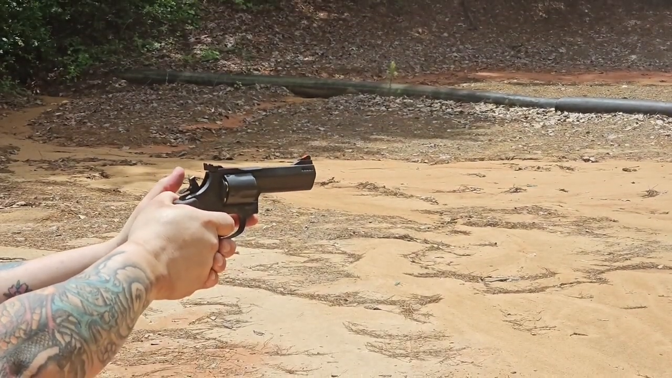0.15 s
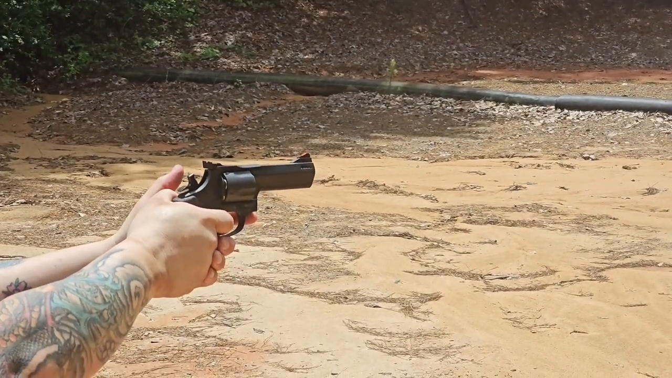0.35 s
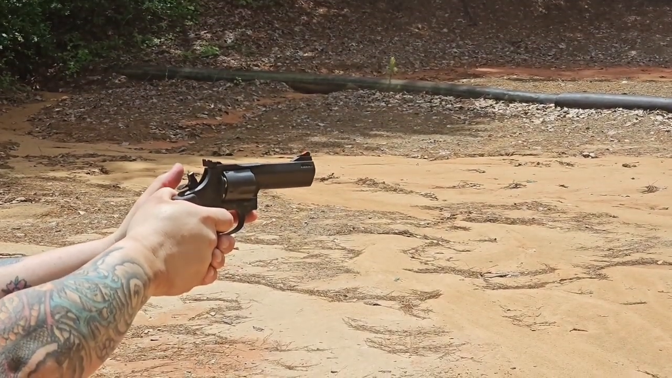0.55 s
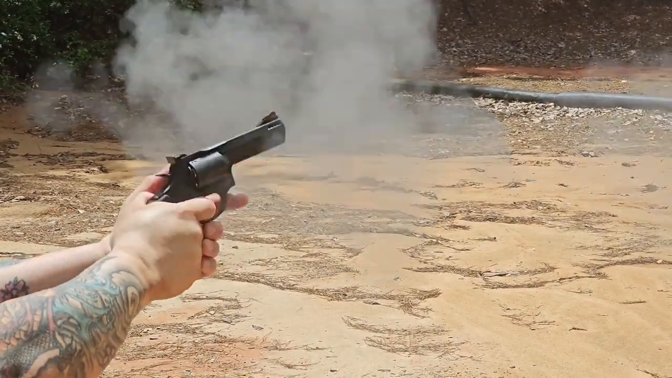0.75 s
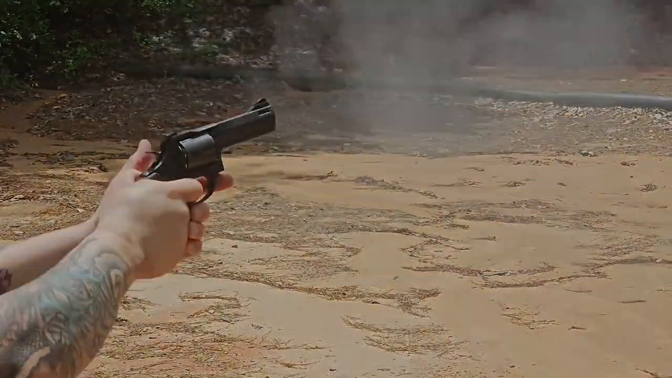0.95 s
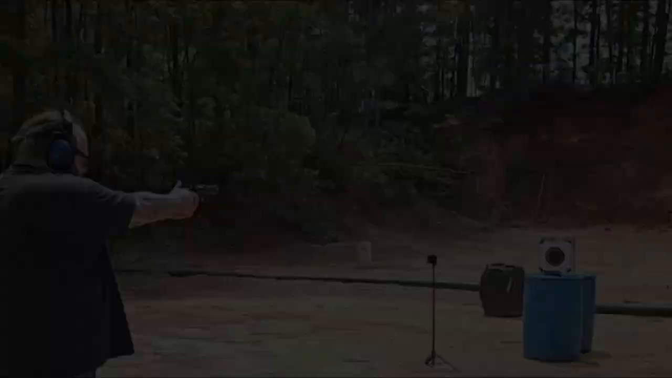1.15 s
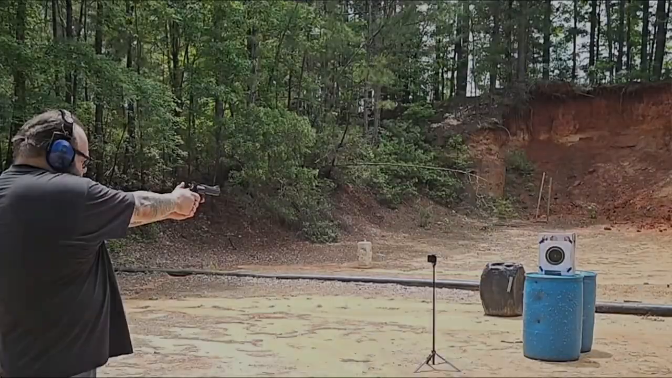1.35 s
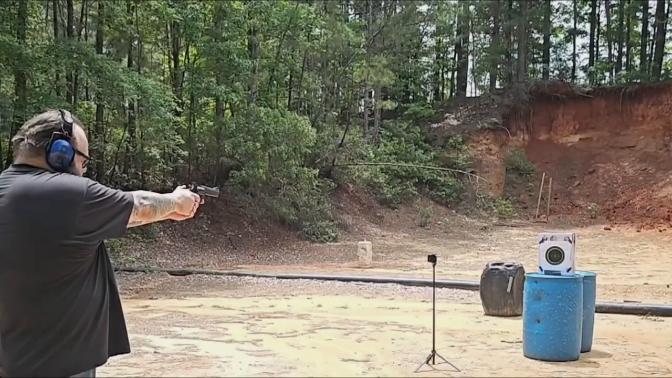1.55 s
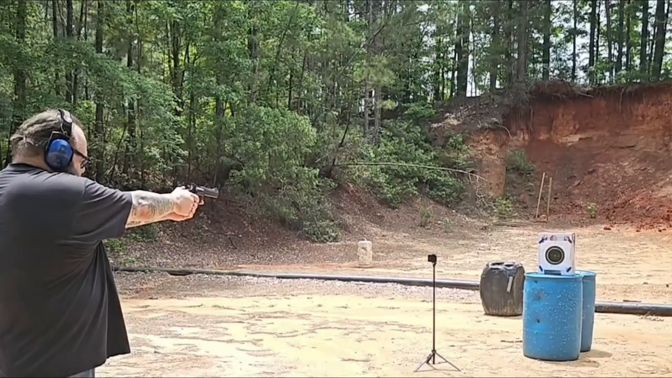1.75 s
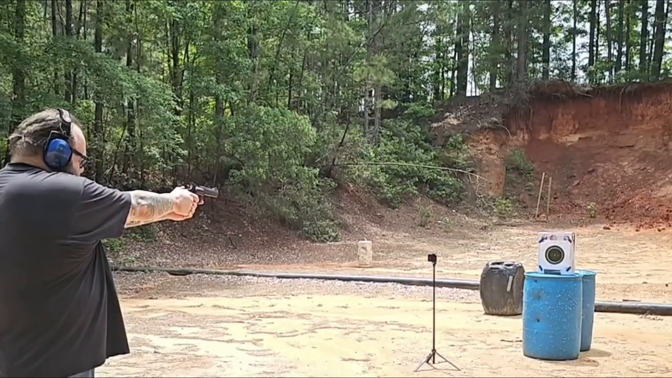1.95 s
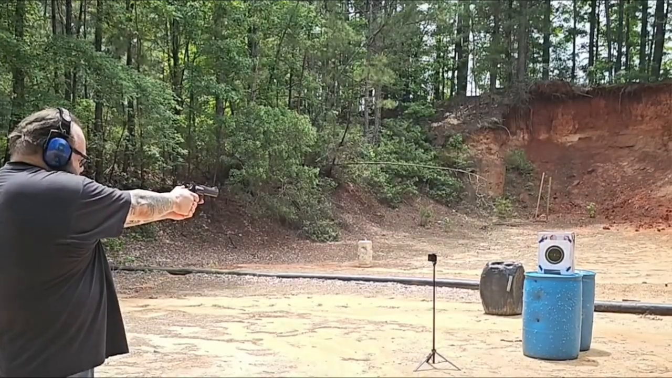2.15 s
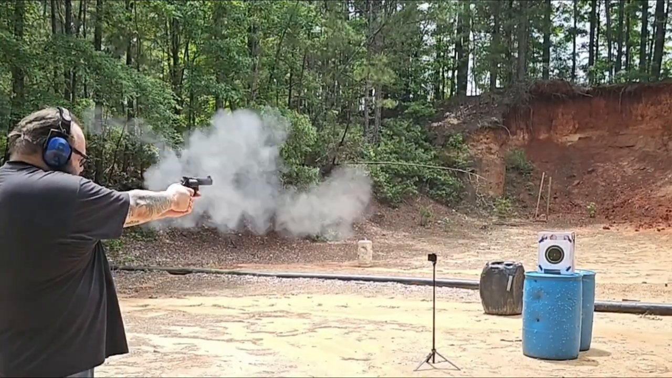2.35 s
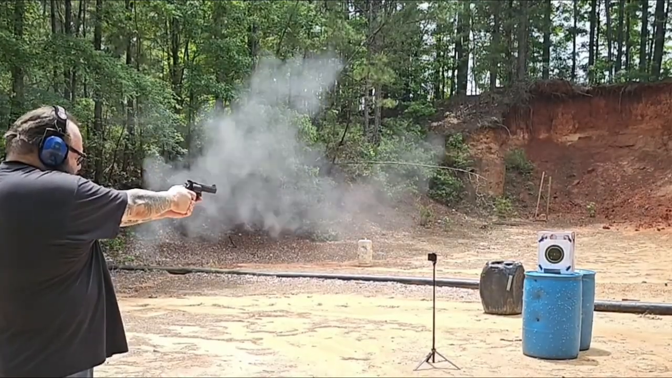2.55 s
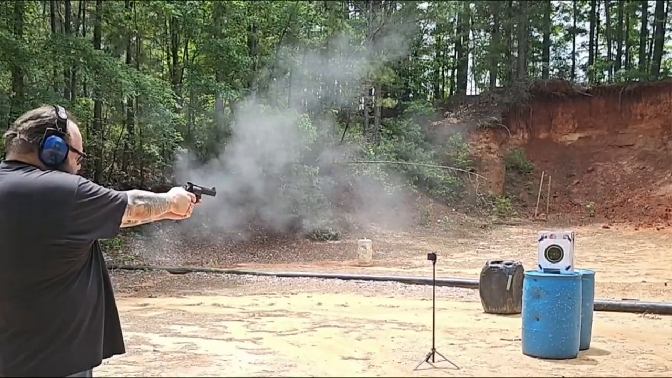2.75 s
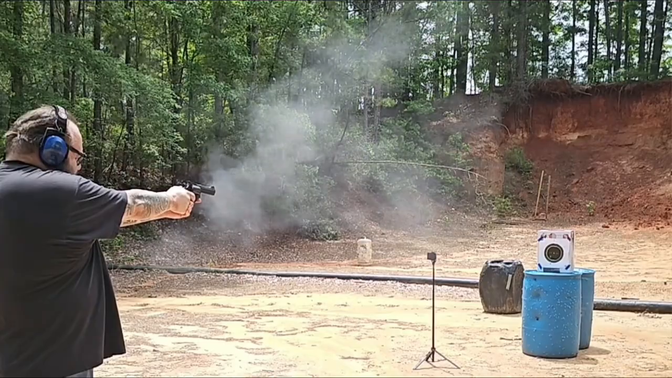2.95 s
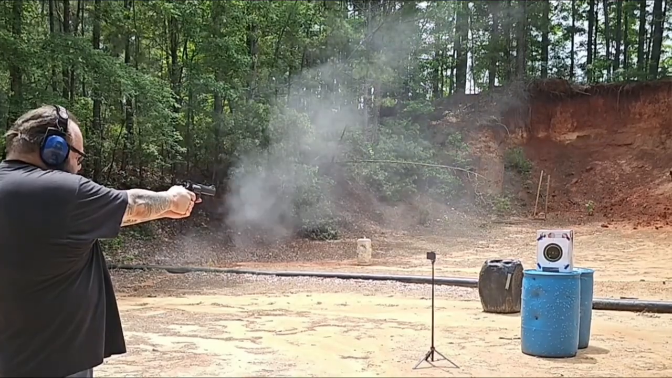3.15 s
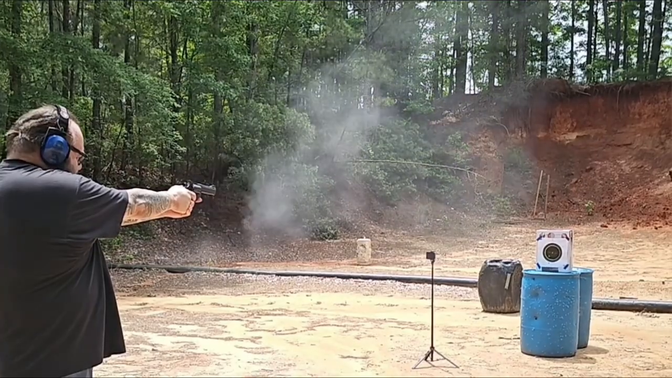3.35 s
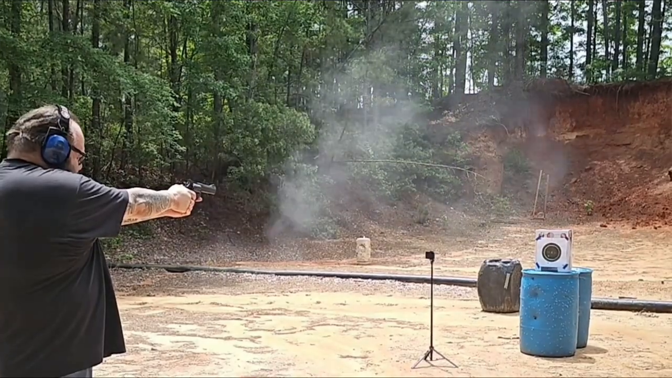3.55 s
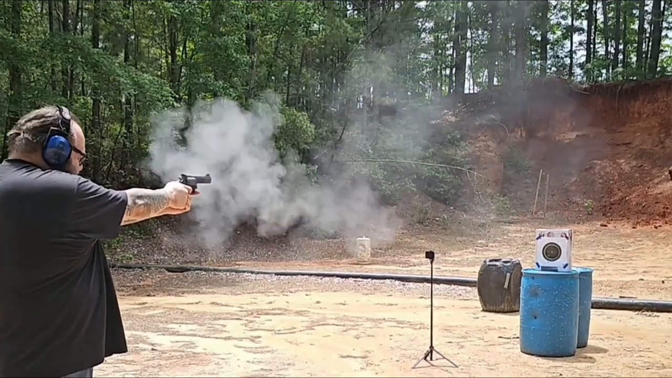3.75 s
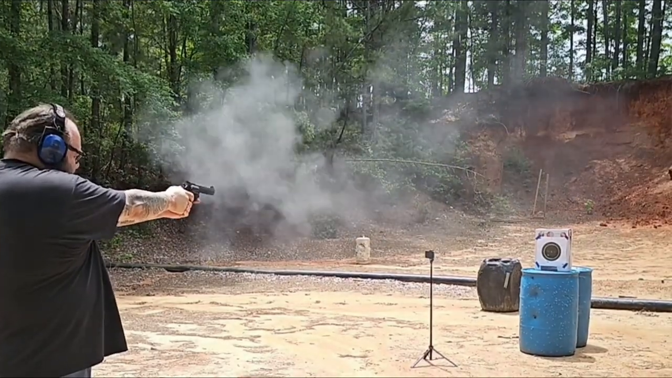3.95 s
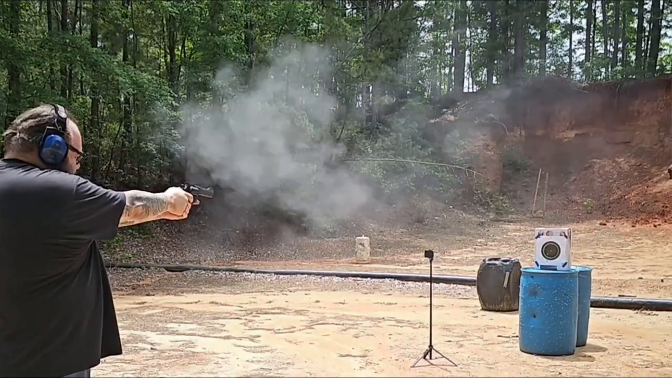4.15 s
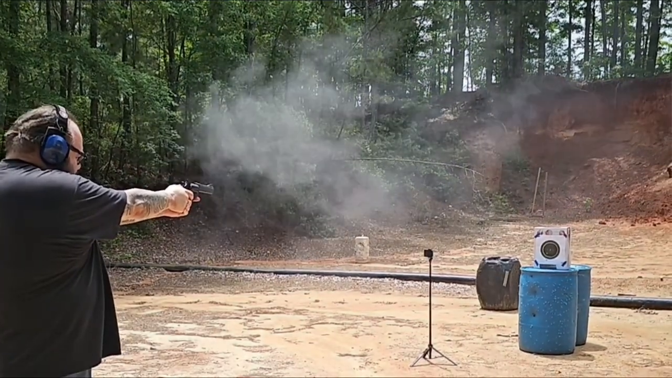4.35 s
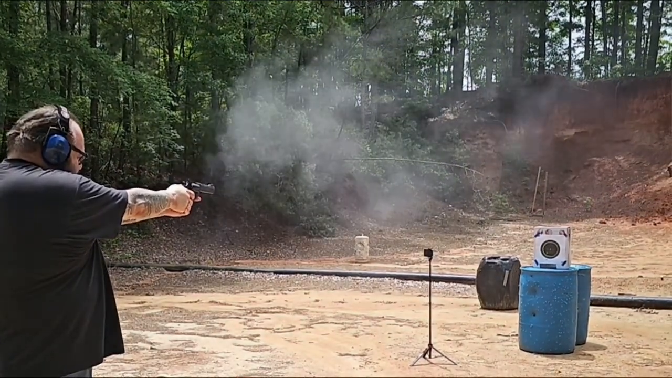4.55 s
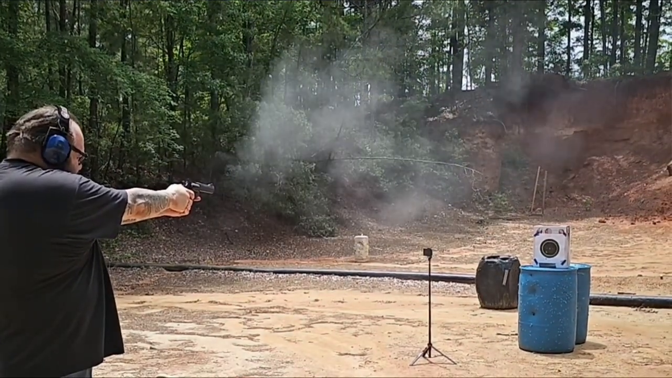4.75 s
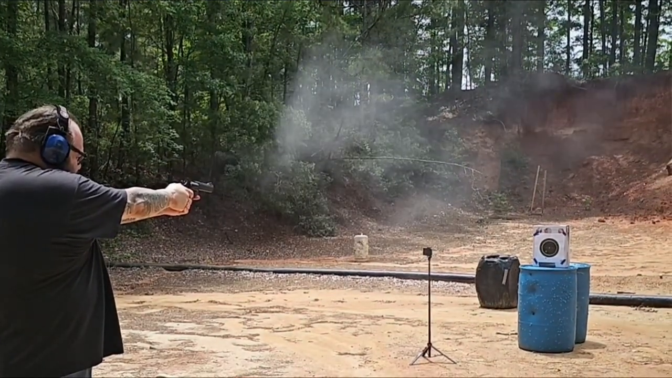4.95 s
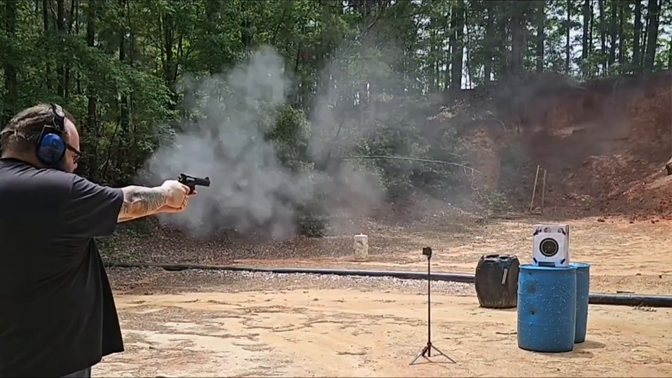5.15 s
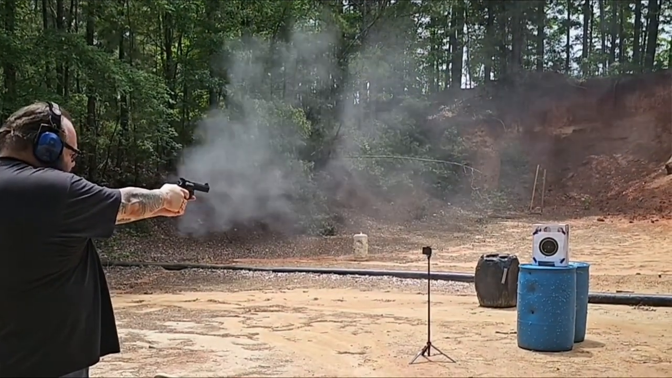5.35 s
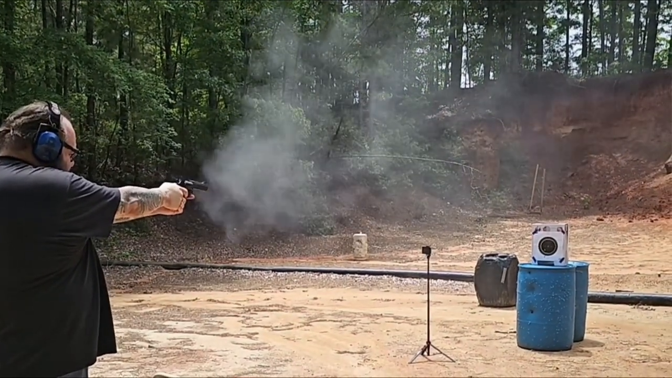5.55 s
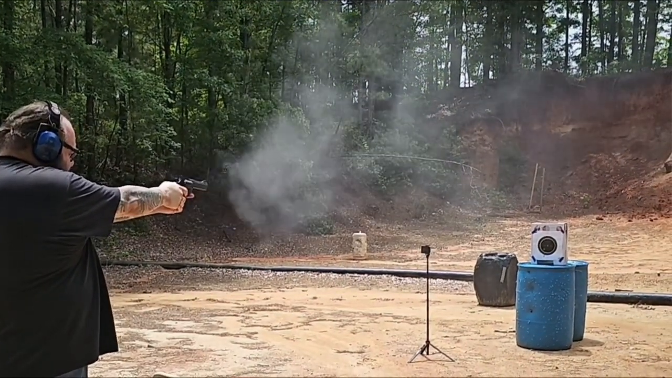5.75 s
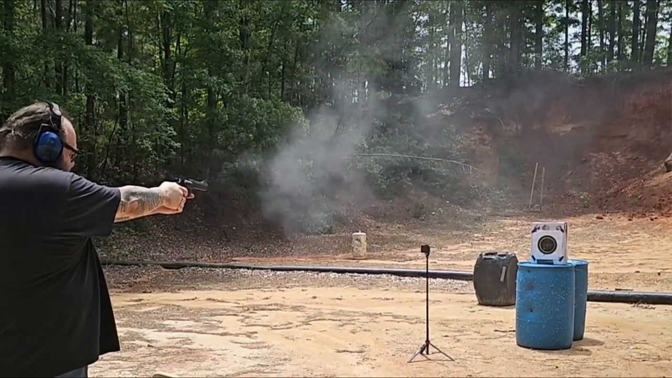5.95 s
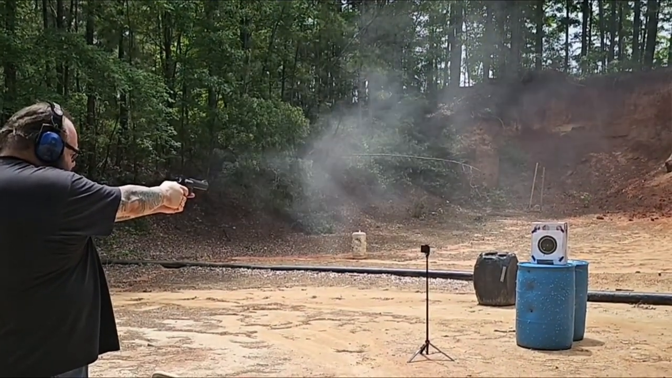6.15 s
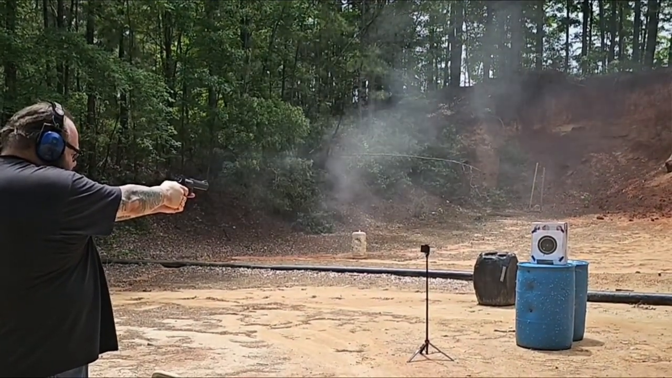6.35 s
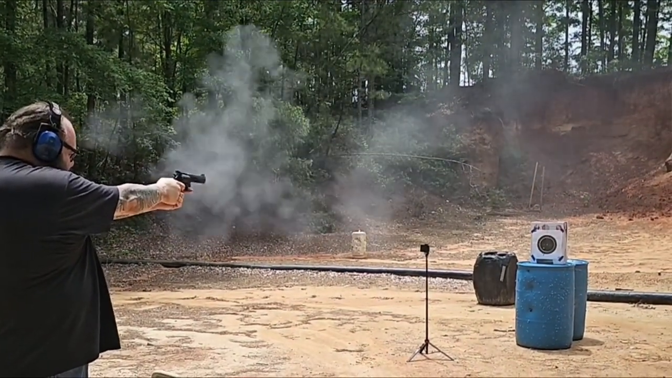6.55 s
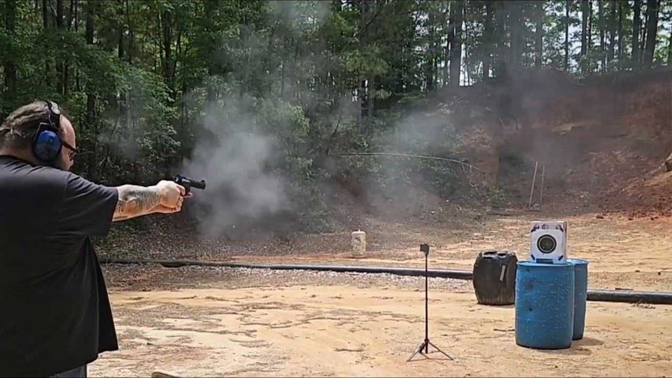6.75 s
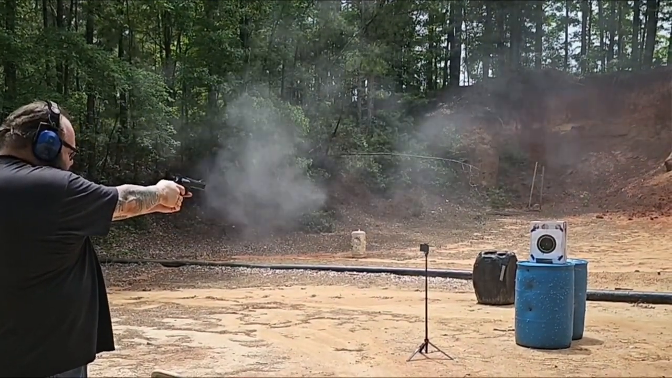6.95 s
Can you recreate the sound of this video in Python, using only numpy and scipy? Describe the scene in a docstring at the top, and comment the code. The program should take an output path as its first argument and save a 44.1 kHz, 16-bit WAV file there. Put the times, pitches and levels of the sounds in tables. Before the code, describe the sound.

Wind buffets the microphone, a close gunshot bursts and cuts to silence, then four separate revolver blasts echo off earth banks and woods.

```python
"""An outdoor range with earth banks and a wood behind: five revolver shots.
The first is heard from beside the gun, with wind on the microphone, and is cut short; after a silence
four more follow from behind the shooter. Blasts are decaying shock waves and noise that overload two ports,
slaps are band-passed clicks with scatter, and the roll through the trees is noise shaped over time and frequency.
Wind, hush and faint air are coloured noise; eddies and low bumps are short puffs of pressure."""
import sys
import numpy as np
from scipy import signal
from scipy.fft import rfft, irfft
from scipy.io import wavfile
from scipy.ndimage import uniform_filter1d

SR = 44100
rng = np.random.default_rng(int(sys.argv[2]) if len(sys.argv) > 2 else 0)


def inscribe(sig):
    """Save sig as 16-bit PCM at rate SR to the path in sys.argv[1].

    A 1-D sig is mono; a 2-D sig holds one channel per row.
    Samples are clipped to [-1, 1] before scaling.
    """
    pcm = np.round(np.clip(np.atleast_2d(sig).T, -1, 1) * 32767)
    wavfile.write(sys.argv[1], SR, pcm.astype(np.int16))


N = 308333

# shots heard from behind the shooter: start_s, blast_db, echo_db
WIDE_SHOTS = [(2.4856, -2, -2.5), (3.8660, -2, 1), (5.1565, -2.5, 1.5), (6.5365, -2, 0.5)]
CLOSE_SHOT_S = 0.854


def amp(db):
    """Level law: twenty decibels are a factor of ten in pressure."""
    return 10 ** (np.asarray(db) / 20)


def evened(x):
    """Normalization: scales a signal to an rms value of 1."""
    return x / np.sqrt(np.mean(x ** 2) + 1e-20)


def read(points, hz):
    """Logarithmic pitch: a spectrum is interpolated along log frequency."""
    f, value = np.transpose(points)
    return np.interp(np.log(hz + 1), np.log(f + 1), value)


def ramp(t, length):
    """Linear transition: 0 up to time zero, 1 from the given length onward."""
    return np.clip(t / length, 0, 1)


def hump(t, rise, fall):
    """Gaussian envelope: peaks at time zero, with separate time constants before and after."""
    return np.exp(-(t / np.where(t < 0, rise, fall)) ** 2)


def add(mix, s, sound):
    """Superposition: sums a sound into the mix from time s."""
    part = mix[:, max(round(s * SR), 0):][:, :sound.shape[-1]]
    part += sound[..., :part.shape[1]]


def seconds(length):
    """Sampling: a time axis in seconds."""
    return np.arange(round(length * SR)) / SR


def diffuse(colour, size):
    """Diffuse-field coherence: the ports agree only for waves longer than the gap between them."""
    port_gap_m, sound_speed_m_per_s = 0.17, 343
    hz = np.fft.rfftfreq(size, 1 / SR)
    a, b = rfft(rng.standard_normal((2, size)))
    coherence = np.sinc(2 * hz * port_gap_m / sound_speed_m_per_s)
    other_port = coherence * a + np.sqrt(1 - coherence ** 2) * b
    spectra = np.array([a, other_port]) * amp(read(colour, hz))
    return evened(irfft(spectra, size))


def band(x, hz, width):
    """Cascaded resonance: two passes through one resonator steepen its skirts."""
    # each pass is wider, so that the pair has about the given width
    b, a = signal.iirpeak(hz, hz / min(1.5 * width, SR / 4), fs=SR)
    once = signal.lfilter(b, a, x)
    return signal.lfilter(b, a, once)


def puff(hz, length):
    """Low-frequency pressure pulse: a Gaussian over a cosine of random phase, centred in 0.1 s."""
    t = seconds(.1) - .05
    return np.exp(-(t / length) ** 2) * np.cos(2 * np.pi * (hz * t + rng.random()))


def tilted(x, tilt):
    """Level difference between ports: half is added at the left port, half taken from the right."""
    lean_db = read(tilt, np.fft.rfftfreq(x.shape[1], 1 / SR))
    return irfft(rfft(x) * amp([lean_db / 2, -lean_db / 2]), x.shape[1])


def hush(dulling_s=.1):
    """Ambient noise: a hush that grows; from the first of the four shots on it is duller and quieter."""
    # hush before and after that shot: pitch_hz, relative_level_db (per Hz)
    hush_colour = [(20, -8), (60, 4), (130, -3), (290, -8.5), (420, 1), (510, -6.5), (650, 1), (900, 0.5),
                   (1150, -9), (1500, 0), (2300, -4.5), (3100, -18), (4000, -11.5), (5600, -33),
                   (6600, -23), (7900, -52), (9500, -33), (15000, -30.5)]
    dull_colour = [(25, -19.5), (90, -17), (170, -9), (230, 7.5), (400, 1), (800, -7.5), (1500, 3.5),
                   (2400, -12.5), (3300, -14), (3900, -19.5), (4900, -40.5), (16000, -48)]
    hush_db, dull_hush_db, growth_db_per_s = -59, -67.5, 1.12  # levels apply at that shot
    t = np.arange(N) / SR - WIDE_SHOTS[0][0]
    dulled = ramp(t, dulling_s)
    clear = (1 - dulled) * amp(hush_db) * diffuse(hush_colour, N)
    dull = dulled * amp(dull_hush_db) * diffuse(dull_colour, N)
    return amp(growth_db_per_s * t) * (clear + dull)


def close_air(air_db=-66):
    """Ambient noise: faint steady outdoor air beside the gun."""
    # air spectrum: pitch_hz, relative_level_db (per Hz)
    air_colour = [(100, -6.5), (300, 1), (650, 1), (1000, -9), (1400, -9.5), (2000, -14.5), (3000, -17.5),
                  (4800, -19.5), (6500, -25.5), (8500, -36), (16000, -38)]
    return amp(air_db) * diffuse(air_colour, N)


def wind(calm_db=-9, gust_db=1.0, eddy_cycles=0.64):
    """Turbulent pressure: low noise independent at each port, common gusts and a few stronger eddies."""
    # wind spectrum: pitch_hz, relative_level_db (per Hz)
    wind_colour = [(15, -14.5), (30, -2), (60, -3), (90, -5), (130, -12.5), (190, -22), (280, -32.5),
                   (450, -49.5), (1000, -61.5), (4000, -100)]
    # single eddies that buffet a port: centre_s, left_db, right_db, pitch_hz
    eddies = [(.174, -25.5, -34, 55), (0.409, -20, -44, 100), (0.508, -22.5, -40, 67.6),
              (0.631, -22.5, -40, 81.6), (.698, -30, -23, 45), (.778, -21, -45, 87)]
    wind_db, rise_s = -35, 0.2
    # the wind noise is turned down by 15 dB just after the shot
    turn_down_start_s, turn_down_length_s, turn_down_db = 0.87, 0.13, -15
    lee_db, lee_end_s = -21.5, 0.4  # the right port starts in the lee and comes out of it steadily
    t = np.arange(N) / SR
    turned_down_db = turn_down_db * ramp(t - turn_down_start_s, turn_down_length_s)
    level_db = wind_db + calm_db * np.exp(-t / rise_s) + turned_down_db
    rates_hz = np.geomspace(3, 11, 6)
    gusts = evened(sum(np.sin(2 * np.pi * (rate * t + rng.random())) for rate in rates_hz))
    ports_db = level_db, level_db + lee_db * (1 - ramp(t, lee_end_s))
    out = np.array([diffuse(wind_colour, N)[0] * amp(db + gust_db * gusts) for db in ports_db])
    for s, left_db, right_db, hz in eddies:
        add(out, s - .05, amp([[left_db], [right_db]]) * puff(hz, eddy_cycles / hz))
    return out


def bumps(cycles=.85):
    """Long-wave pressure: soft low knocks between the shots reach both ports alike."""
    # knocks: centre_s, level_db, pitch_hz
    knocks = [(1.879, -57, 48), (2.051, -58, 55), (3.127, -64, 60), (4.563, -63.5, 55), (5.93, -63, 69.8)]
    out = np.zeros((2, N))
    for s, db, hz in knocks:
        add(out, s - .05, amp(db) * puff(hz, cycles / hz))
    return out


def spreading(t, peak_db, full_s, early_db, open_db, wood_s, wood_db):
    """Spreading loss: scatter builds until full_s, then falls per doubling of path, at wood_db within the wood."""
    open_doublings = np.log2(np.clip(t, full_s, wood_s) / full_s)
    wood_doublings = np.log2(np.maximum(t / wood_s, 1))
    build_up_db = early_db * (1 - ramp(t, full_s) ** 2)
    return amp(peak_db + build_up_db - open_db * open_doublings - wood_db * wood_doublings)


def roll(colour, t, start_hz, glide_s, lift_db, bank_db, patchy_db=1.5, band_octaves=0.15, fade_s=0.32):
    """Reverberant scattering: uneven clumps, a favoured band gliding to the far bank's note, and treble loss."""
    # loss on the way: pitch_hz, loss_db_per_s
    air_loss = [(100, -3.5), (1500, 0.5), (3000, 9.5), (6000, 20), (11000, 39), (16000, 55)]
    # the far bank answers after arrival_s; the favoured band settles on note_hz
    arrival_s, note_hz, bank_spread_s = 0.2065, 684.4, 0.011
    hz, at, z = signal.stft(diffuse(colour, len(t)), SR, nperseg=512)
    clumps = uniform_filter1d(rng.standard_normal(z.shape[1:]), size=5, axis=0)
    clumps = uniform_filter1d(clumps, size=5, axis=1)
    favoured_hz = start_hz + (note_hz - start_hz) * ramp(at, glide_s)
    octaves = np.log2((hz[:, None] + 1) / favoured_hz)
    # the band swells while the bank sounds, then fades
    favour_db = lift_db * np.exp(-np.maximum(at - arrival_s, 0) / fade_s)
    favour_db = favour_db + bank_db * hump(at - arrival_s, bank_spread_s, bank_spread_s)
    band_db = favour_db * np.exp(-(octaves / band_octaves) ** 2)
    loss_db = read(air_loss, hz)[:, None] * at
    shaped = z * amp(patchy_db * evened(clumps) + band_db - loss_db)
    return signal.istft(shaped, SR, nperseg=512)[1][:, :len(t)]


def wide_roll():
    """Diffuse scattering from ground and trees behind the shooter: the favoured band glides down."""
    # scatter spectrum: pitch_hz, relative_level_db (per Hz)
    wide_colour = [(30, -28), (80, -20), (150, -8), (240, -5), (380, -2), (530, -3), (800, 0.5), (1200, -3),
                   (1800, -0.5), (3200, -8.5), (5000, -17), (7500, -22.5), (12500, -24), (16000, -38)]
    t = seconds(1.6)
    level = spreading(t, peak_db=-16.5, full_s=0.037, early_db=-18.5, open_db=4.0, wood_s=0.21, wood_db=15.0)
    return level * roll(wide_colour, t, start_hz=1204, glide_s=0.21, lift_db=5.5, bank_db=11.0)


def reflections(rows, scatter, frontal_hz=1100):
    """Reflection: each surface gives a clean slap plus scatter from its depth, in the band its size favours."""
    out, t = np.zeros((2, SR)), seconds(.1)
    for delay, db, hz, width, depth, pan_db in rows:
        spread = diffuse([(20, 0), (20000, 0)], len(t)) * np.exp(-t / depth)
        # long waves from ahead reach both ports alike
        spread = spread + spread[::-1] / (1 + (hz / frontal_hz) ** 2) ** 2
        slap = band((t == 0) + scatter * spread, hz, width)
        # unit rms over 10 ms
        slap = slap * np.sqrt(.01 * SR / np.sum(slap ** 2, axis=1, keepdims=True))
        add(out, delay, amp([[db + pan_db / 2], [db - pan_db / 2]]) * slap)
    return out


def close_echoes():
    """Reflection and scattering as heard beside the gun: the favoured band glides up."""
    # scatter spectrum: pitch_hz, relative_level_db (per Hz)
    close_colour = [(30, -16), (90, -9), (180, -2), (380, -5), (680, 0.5), (1100, -3), (1800, -2),
                    (3500, -5.5), (6000, -8.5), (9000, -14.5), (12000, -17), (16000, -23)]
    # surfaces: delay_s, level_db (over 10 ms), centre_hz, width_hz, depth_s, left_minus_right_db
    surfaces = [(.0265, -16.5, 4404, 5000, 0.0065, -0.5), (.059, -17, 1308, 1500, .009, -1),
                (.081, -17.5, 2000, 2990, .0097, 0), (.085, -21, 213.5, 70.2, .0035, -3.5),
                (.118, -23, 210, 70.6, .006, -1), (.158, -20, 260, 123.4, 0.00011, 4.5),
                (.18, -24, 153, 50, .011, -4), (.226, -22.5, 190, 70, 0.028, -3.5),
                (.39, -29.5, 195, 400, 0.0041, 5)]
    out, t = np.zeros((2, N)), seconds(.5)
    level = spreading(t, peak_db=-14.0, full_s=0.049, early_db=-22.5, open_db=6.0, wood_s=0.32, wood_db=13)
    trees = roll(close_colour, t, start_hz=400, glide_s=.135, lift_db=10.0, bank_db=11.5)
    add(out, CLOSE_SHOT_S, level * trees)
    add(out, CLOSE_SHOT_S, reflections(surfaces, scatter=0.61))
    return out


def tick(tick_db=-26, lead_s=.007, centre_hz=2100, width_hz=1200, fade_s=0.0052):
    """Band-limited noise: a short tick of about 2 kHz, 7 ms before the first of the four shots."""
    out, t = np.zeros((2, N)), seconds(0.0032)
    noise = rng.standard_normal((2, len(t)))
    burst = evened(band(noise, centre_hz, width_hz)) * np.exp(-t / fade_s)
    add(out, WIDE_SHOTS[0][0] - lead_s, amp(tick_db) * burst)
    return out


def blast(t, length):
    """Blast wave: an abrupt shock front decays into the suction that follows it."""
    u = np.maximum(t, 0) / length
    return (t >= 0) * (1 - u) * np.exp(-u)


def overload(crack_db=-5, crack_s=0.0016, ground_s=.0036, ground_db=11, ground_len_s=0.001, swing_hz=49,
             swing_db=-7, swing_s=0.018, swing_len_s=.0095, fizz_db=-7, left_db=-22, edge_hz=1200,
             low_hz=250, gas_db=-11, gas_s=0.0032):
    """Saturation by muzzle blast and ground bounce: the left port rattles, the right clips and swings slowly back."""
    # rattle spectrum: pitch_hz, relative_level_db (per Hz)
    rattle_colour = [(60, -28.5), (140, -14.5), (280, 2), (600, -9.5), (900, -3.5), (1250, 0.5),
                     (1600, 6.5), (2200, -8), (3300, -9), (5000, -20.5), (7000, -19), (10000, -28),
                     (15000, -24.5)]
    # the rattle holds while the blast lasts, then dies; it is loudest as the shock front arrives
    rattle_db, hold_s, fall_db_per_s = -13, 0.025, 1505
    front_db, front_s = 5, 0.0014
    t = seconds(.12)
    shocks = amp(crack_db) * blast(t, crack_s) + amp(ground_db) * blast(t - ground_s, ground_len_s)
    port_band = signal.butter(1, [low_hz, edge_hz], "band", fs=SR, output="sos")
    shocks = signal.sosfilt(port_band, -2 * shocks)
    swing = amp(swing_db) * np.cos(2 * np.pi * swing_hz * t) * np.exp(-((t - swing_s) / swing_len_s) ** 2)
    left, right = diffuse(rattle_colour, len(t))
    decay_db = fall_db_per_s * np.maximum(t - hold_s, 0)
    rattle = amp(rattle_db - decay_db + front_db * np.exp(-t / front_s))
    gas = amp(gas_db) * np.exp(-(t / gas_s) ** 4)
    pressure = np.tanh(shocks) + swing
    left_port = left * rattle + amp(left_db) * pressure
    right_port = right * (amp(fizz_db) * rattle + gas) + pressure
    return np.array([left_port, right_port])


def wide_shots(change=0.25, echo_share=0.66):
    """Impulse response: the range answers each shot almost alike; moving air changes a share of the scatter."""
    # surfaces: delay_s, level_db (over 10 ms, before the shot's echo level),
    # centre_hz, width_hz, depth_s, left_minus_right_db
    surfaces = [(.0275, -15.5, 983, 516, .0002, 6.5), (.0272, -19, 287, 200, 0.00079, 5.5),
                (.0465, -17.5, 750, 600, 0.0094, -5), (.0505, -21.5, 1800, 1800, .008, 3),
                (.052, -18.5, 267, 163, 0.011, 5.5), (.079, -26, 2380, 913, 0.0071, 4),
                (.1575, -23.5, 230, 132, .003, 3.5), (.165, -22, 680, 500, 0.014, 3.5),
                (.174, -30, 208, 141, .006, 2.5), (.218, -25, 191, 116, 0.0028, -2)]
    # port difference of the scatter: pitch_hz, left_minus_right_db
    port_tilt = [(60, -1), (200, 3), (600, -1.5), (1300, 1.5), (2500, 2), (5000, 3), (8000, 9), (14000, -7)]
    out = np.zeros((2, N))
    steady, slaps = wide_roll(), reflections(surfaces, scatter=0.32)
    for s, blast_db, echo_db in WIDE_SHOTS:
        # power shares of the common and the new scatter
        trees = np.sqrt(1 - change) * steady + np.sqrt(change) * wide_roll()
        add(out, s, amp(blast_db) * overload())
        add(out, s, amp(echo_db) * tilted(trees, port_tilt))
        add(out, s, amp(echo_share * echo_db) * slaps)  # slaps follow only part of the echo level
    return out


def close_blast(ring_lean_db=4.0, waver=0.088):
    """Shock-excited resonance: a crackling blast with a low punch sets the overloaded ports ringing."""
    # crackle spectrum: pitch_hz, relative_level_db (per Hz)
    crackle_colour = [(50, -21), (140, -18), (260, -7), (450, -1), (900, -8), (1500, 1.5), (2400, 5),
                      (4000, -0.5), (6500, -9.5), (9500, -15), (16000, -14.5)]
    # port rings, the second higher: centre_s, level_db (mean of the ports), pitch_hz, length_s
    rings = [(.850, -10.5, 1410, 0.0093), (.861, -13, 1734, .0055)]
    crackle_db, rise_s, fall_s = -15, .015, 0.027
    punch_lead_s, punch_db, punch_hz, punch_length_s = 0.003, -17, 245, 0.013
    out, t = np.zeros((2, N)), seconds(.2) - .05
    crackle = hump(t, rise_s, fall_s) * diffuse(crackle_colour, len(t))
    add(out, CLOSE_SHOT_S + t[0], amp(crackle_db) * crackle)
    add(out, CLOSE_SHOT_S - punch_lead_s + t[0], amp(punch_db) * puff(punch_hz, punch_length_s))
    for s, db, hz, length in rings:
        wobble = evened(uniform_filter1d(rng.standard_normal((2, len(t))), size=30))
        cycles = np.cumsum(hz * (1 + waver * wobble), axis=1) / SR
        ring = np.sqrt(2) * np.sin(2 * np.pi * cycles)
        lean = amp([[db + ring_lean_db], [db - ring_lean_db]])
        add(out, s + t[0], lean * hump(t, length, length) * ring)
    return out


def scene():
    """Superposition in two views: the close one stops dead; after a short silence the wide one begins."""
    # port difference beside the gun: pitch_hz, left_minus_right_db
    close_tilt = [(200, -0.5), (1500, 0), (4000, -0.5), (8000, -3.5), (13000, -6)]
    close_end_s, wide_start_s = 1.262, 1.39
    t = np.arange(N) / SR
    close = close_air() + wind() + tilted(close_echoes() + close_blast(), close_tilt)
    wide = hush() + bumps() + tick() + wide_shots()
    return close * ramp(close_end_s - t, .002) + wide * ramp(t - wide_start_s, .008)


def record(dry):
    """Soft saturation and band limiting: peaks round off at full scale, then a low-pass removes the top."""
    edge_hz = 15700
    limited = dry / (1 + dry ** 6) ** (1 / 6)
    low_pass = signal.firwin(255, edge_hz, window=("kaiser", 9), fs=SR)
    return signal.oaconvolve(limited, low_pass[None], "same")


dry = scene()
out = record(dry)
inscribe(out)
```